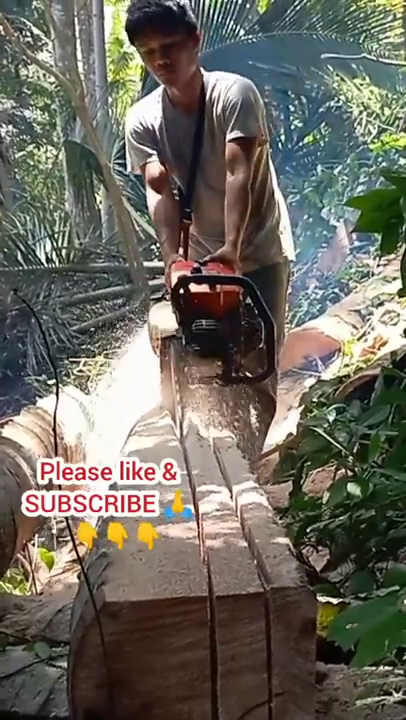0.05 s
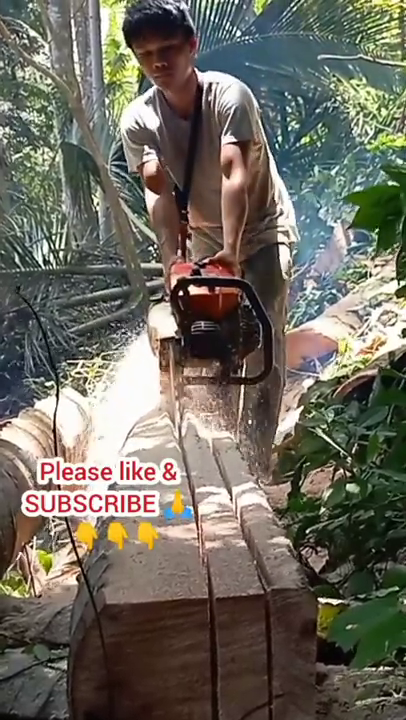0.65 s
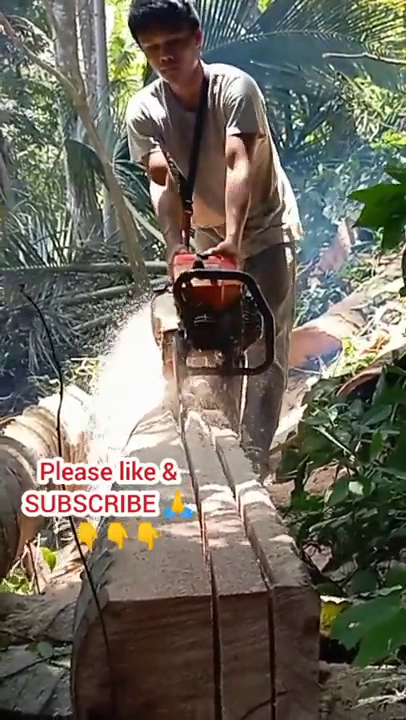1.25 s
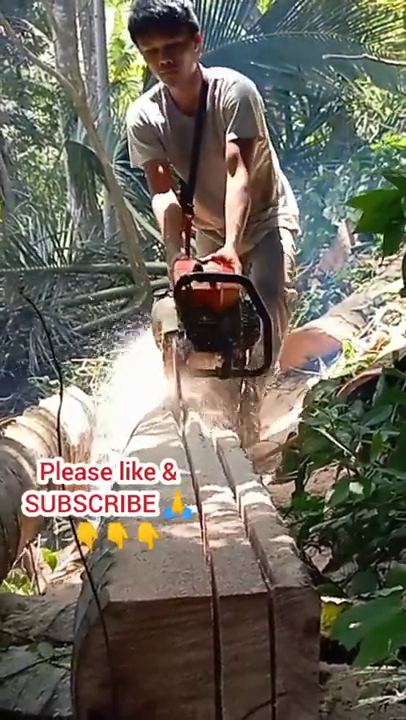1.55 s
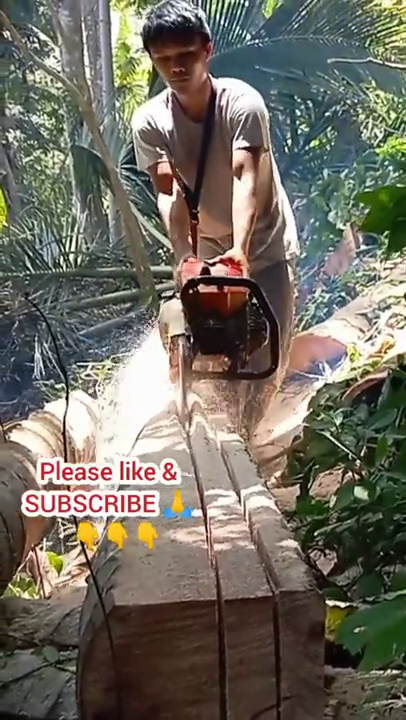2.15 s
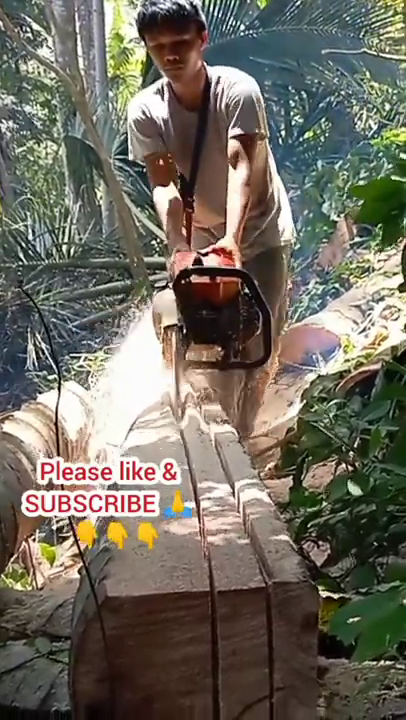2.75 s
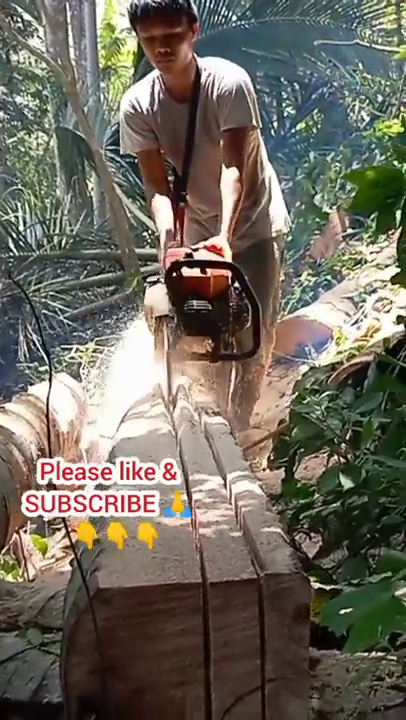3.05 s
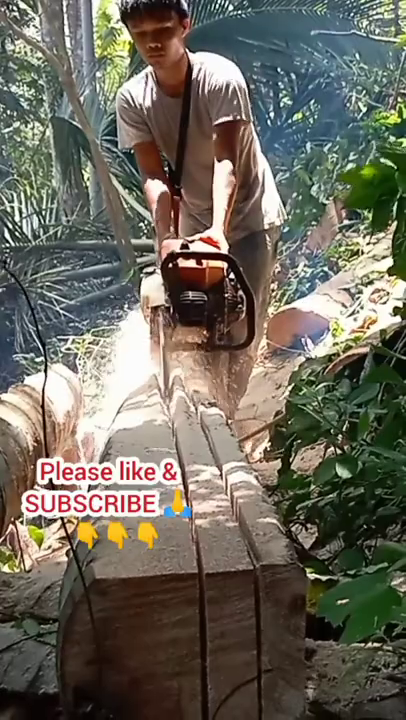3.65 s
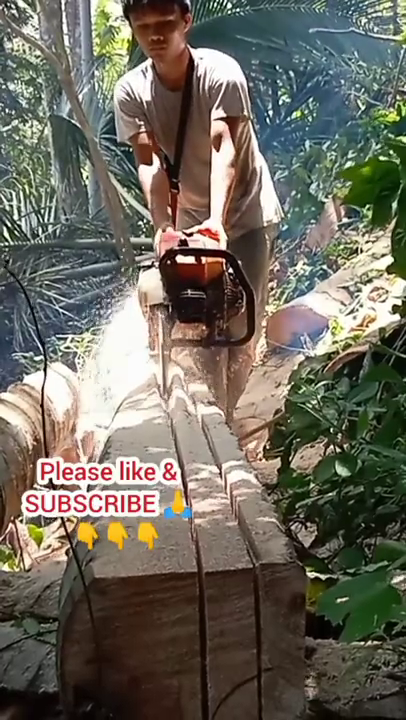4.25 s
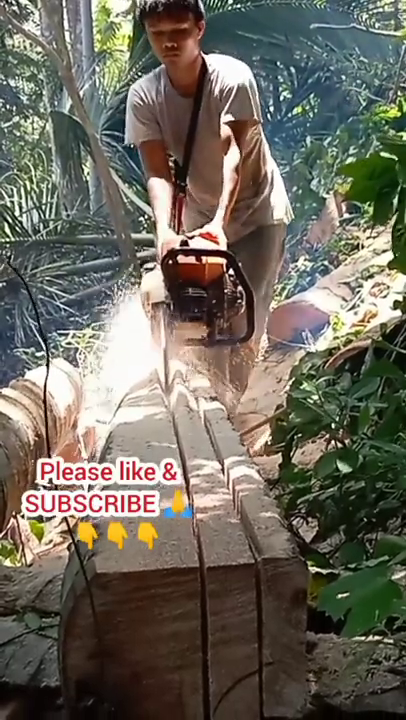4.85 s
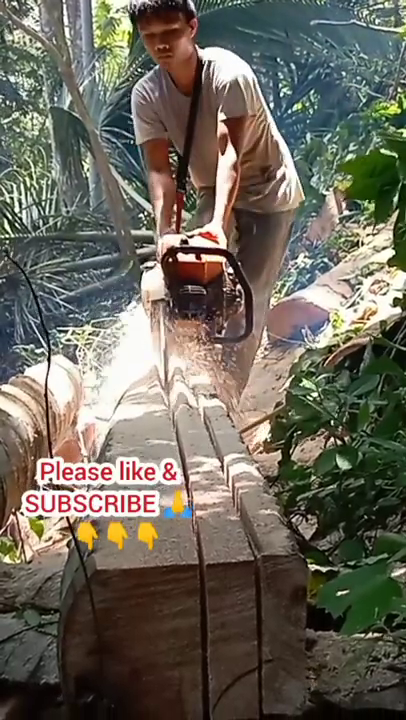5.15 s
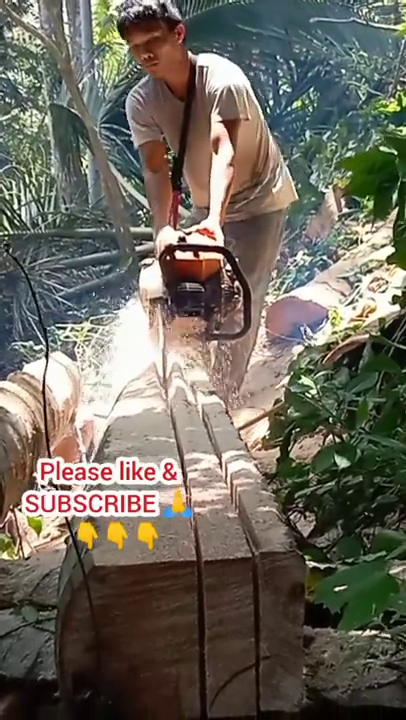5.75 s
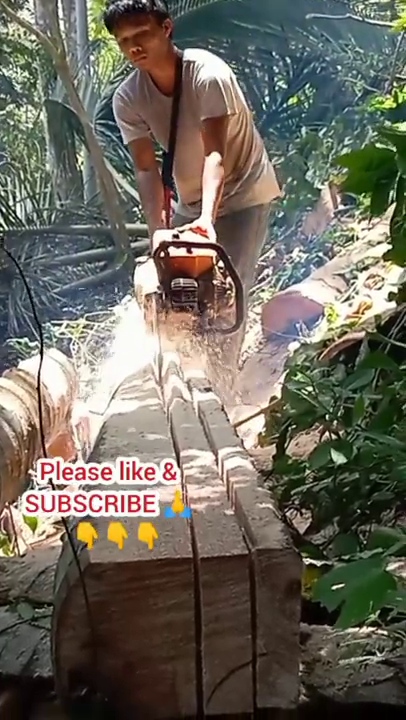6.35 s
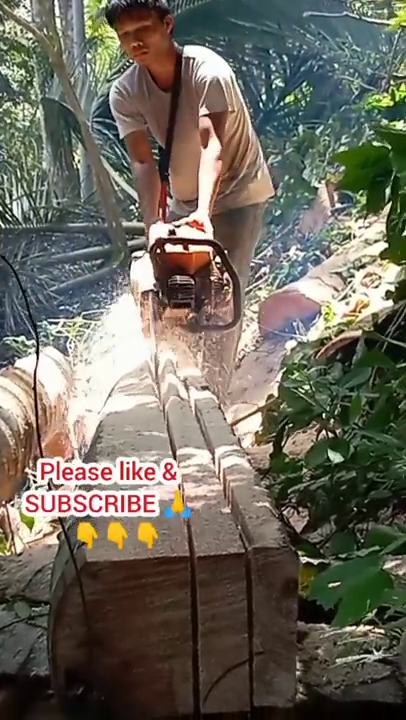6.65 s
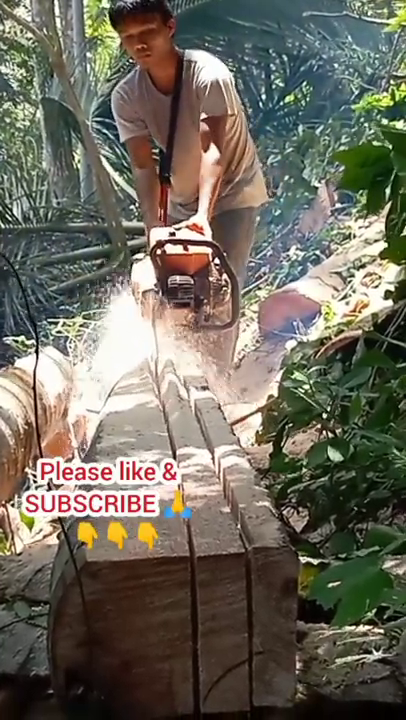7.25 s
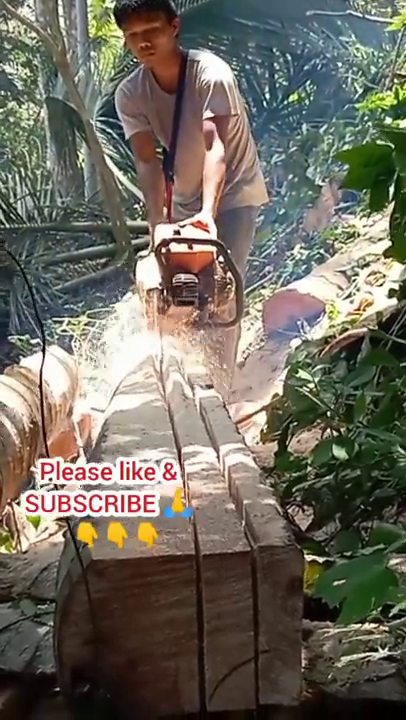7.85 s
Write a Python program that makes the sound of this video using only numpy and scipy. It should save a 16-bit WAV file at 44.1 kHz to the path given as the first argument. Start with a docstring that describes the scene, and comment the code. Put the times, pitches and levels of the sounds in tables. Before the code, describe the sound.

A large two-stroke chainsaw runs at full throttle a few metres away outdoors, cutting lengthwise along a log. Its loud, raspy buzz has a metallic ring and a hissing exhaust. The pitch sags and recovers again and again as the chain bites, with grinding from the cut underneath and a thin, high hiss of spraying chips. It never stops or idles.

```python
"""A large two-stroke chainsaw rips along a log at full throttle, outdoors, a few metres away.
Every turn of the crank fires one exhaust pop, rings the muffler and blows a hissing jet of gas.
The speed sags and recovers as the chain bites; the cutters grind in the cut and throw chips.
A thin, very high hiss rises and falls with the chips."""
import sys
import numpy as np
from scipy import signal
from scipy.fft import rfft, irfft, next_fast_len
from scipy.io import wavfile
from scipy.ndimage import uniform_filter1d, map_coordinates

SR = 44100
rng = np.random.default_rng(int(sys.argv[2]) if len(sys.argv) > 2 else 0)


def wav_out(sig):
    """Save sig, one row per channel (or a flat mono array), as 16-bit PCM at SR to the path in sys.argv[1]."""
    wavfile.write(sys.argv[1], SR, np.round(np.clip(np.atleast_2d(sig).T, -1, 1) * 32767).astype(np.int16))


N = 348831

# The pop's upper tones and the puff weaken as the saw turns away.
# Each row: time in seconds, relative level in dB.
EXHAUST_LEVEL = [(0.0, -27.5), (0.02, -29), (3.61, -29.5), (4.67, -30), (5.18, -31), (7.51, -31.5),
                 (7.91, -30.5)]


def amp(db):
    """Turn decibels into a gain."""
    return 10 ** (np.asarray(db) / 20)


def unit(x):
    """Scale to an average (rms) level of 1."""
    return x / np.sqrt(np.mean(x ** 2) + 1e-20)


def steady(x):
    """Hold the level near 1 all the time, keeping the single firings."""
    power = uniform_filter1d(uniform_filter1d(x ** 2, size=2600), size=2600)
    return x / np.sqrt(np.abs(power) + 1e-12)


def curve(rows):
    """Join (seconds, value) points with straight lines."""
    return np.interp(np.arange(N) / SR, *np.transpose(rows))


def swells(rows):
    """A dB curve with one smooth bump or dip for each row."""
    t = np.arange(N) / SR
    return sum(db * np.exp(-((t - middle) / half) ** 2) for middle, half, db in rows)


def wobble(rate):
    """A smooth random curve of level 1, through `rate` random points a second."""
    points = rng.standard_normal(int(N * rate / SR) + 4)
    coarse = np.linspace(0, N, 8192)
    return unit(np.interp(np.arange(N), coarse, map_coordinates(points, [coarse * rate / SR])))


def causal(gain):
    """The frequency response with these gains that starts at once and then rings out."""
    cepstrum = irfft(np.log(np.maximum(gain, 1e-6)))
    half = len(cepstrum) // 2
    cepstrum[1:half] *= 2
    cepstrum[half + 1:] = 0
    return np.exp(rfft(cepstrum))


def coloured(x, spectrum, peaks=()):
    """Pass x through a body with this spectrum and these narrow peaks; the result has level 1."""
    hz, db = np.transpose(spectrum)
    grid = np.fft.rfftfreq(8192, 1 / SR)
    body_db = np.interp(np.log(grid + 1), np.log(hz + 1), db)
    for centre, width, boost in peaks:
        body_db += boost / (1 + (2 * (grid - centre) / width) ** 2)
    return unit(signal.fftconvolve(x, irfft(causal(amp(body_db))))[:N])


def pulses(turns, jitter_ms, scatter_db):
    """One sharp pulse at each whole turn, a little uneven in time and size."""
    at = np.interp(np.arange(1, int(turns[-1])), turns, np.arange(N))
    late, size = rng.standard_normal((len(at), 2)).T
    at += late * jitter_ms * SR / 1000
    taps = np.floor(at)[:, None] + np.arange(-7, 9)  # a pulse can fall between samples
    offset = taps - at[:, None]
    shape = np.sinc(offset) * np.sinc(offset / 8) * amp(scatter_db * size)[:, None]
    return unit(np.bincount(np.clip(taps, 0, N - 1).astype(int).ravel(), shape.ravel(), N))


def bursts(turns, rise, fall, leak):
    """Noise that surges once a turn over a steady leak; rise and fall are in turns."""
    age = turns % 1
    burst = (1 - np.exp(-age / rise)) * np.exp(-age / fall)
    return unit((burst + leak) * rng.standard_normal(N))


def echoed(x, sway_ms):
    """The log, the ground and the trunks echo the sound; the paths change as the saw sways."""
    # Each row: delay in milliseconds, echo level in dB.
    echoes = [(1.4, -11.5), (2.8, -4.5), (10.6, -10), (20.5, -4.5)]
    now = np.arange(N)
    out = x.copy()
    for delay_ms, db in echoes:
        lag = (delay_ms + sway_ms * wobble(1.6)) * SR / 1000
        out += amp(db) * np.interp(now - lag, now, x, left=0)
    return unit(out) * np.std(x)


def pops(turns):
    """The pressure wave of each firing: clean tones that line up into a pop."""
    # Each row: order (multiple of the firing rate), relative level in dB.
    tones = [(1, -4), (2, -2.5), (3, -1.5), (4, 5), (5, 5), (6, 7.5), (7, 4.5), (8, 2.5), (9, 6),
             (10, -1.5), (11, -1.5), (12, 0.5), (13, -7.5), (14, -16.5), (15, -5), (16, -1), (17, -8.5),
             (18, -12.5), (19, -11.5), (20, -12.5), (21, -16), (22, -10.5)]
    # One tone fades or swells. Each row: middle in seconds, order, half length in seconds, change in dB.
    fades = [(1.22, 5, 0.091, -3), (1.88, 8, 0.15, -18), (1.88, 6, 0.18, -4.5), (2.7, 6, 0.49, -4.5),
             (3.3, 8, 0.26, -24), (3.383, 7, .25, -3.5), (4.3, 6, 0.81, -9), (4.3, 9, 0.92, 3),
             (5.5, 8, 0.98, -3), (5.72, 5, 0.49, -4.5), (5.855, 7, 0.3, 4), (6.63, 6, 0.25, -24),
             (7.012, 7, 0.29, -8), (7.28, 6, 0.13, -14), (7.9, 6, 0.42, -15)]
    order, order_db = np.transpose(tones)
    gains = amp(order_db) / np.linalg.norm(amp(order_db))
    # part of the wave leaves at once, the rest after round trips in the muffler
    direct, trip_turns, smear = 0.84, 0.2, 0.0323
    trip = np.exp(-2j * np.pi * order * trip_turns)
    chamber = (direct + trip) / (1 + direct * trip)
    response = causal(np.r_[gains[0] / 10, gains])[1:]
    phases = np.angle(response * chamber) - smear * order ** 2
    bass, upper = amp(-22.5), amp(curve(EXHAUST_LEVEL) + 5.5)
    wave = np.zeros(N)
    for k, gain, phase in zip(order, gains, phases):
        # a ground bounce drifts in and out of step as the saw sways, most for short waves
        bounce = min(0.03 * k, 0.35) * np.sin(np.pi * wobble(1.2))
        fade = amp(swells([(middle, half, db) for middle, which, half, db in fades if which == k]))
        level = gain * (bass if k < 5 else upper) * fade * (1 + bounce)
        wave += level * np.cos(2 * np.pi * k * turns + phase)
    return np.sqrt(2) * wave * amp(0.56 * wobble(90))


def puffs(turns):
    """Swirling gas bursts out each time the exhaust port opens."""
    # Each row: frequency in Hz, relative level in dB.
    spectrum = [(150, -38), (300, -9), (700, -13.5), (950, -6.5), (1220, -9.5), (1420, -10.5), (1630, -5),
                (2000, -18.5), (2600, -14), (4000, -64)]
    gas = bursts(turns + 0.036, rise=0.082, fall=0.46, leak=0.33)
    return amp(curve(EXHAUST_LEVEL) - 10.5) * coloured(gas, spectrum)


def muffler_ring(blows):
    """Each firing rings the steel muffler, heard directly and off nearby surfaces."""
    # Each row: frequency in Hz, relative level in dB.
    spectrum = [(1500, -30.5), (2100, -30), (2400, -8.5), (2540, -17.5), (2700, -11), (2900, -1), (3050, 5),
                (3160, 5.5), (3300, -1.5), (3410, -17), (3520, -9), (3640, -43), (4200, -19), (5500, -39)]
    # Each row: time in seconds, relative level in dB.
    levels = [(0.0, -26), (0.04, -24.5), (0.31, -26.5), (2.38, -26), (4.01, -25.5), (5.95, -27.5),
              (6.21, -24.5), (6.52, -28.5), (6.85, -24.5), (6.92, -28), (7.49, -25.5), (7.62, -27.5),
              (7.87, -25), (7.91, -28)]
    gain = amp(curve(levels) + 1 + 0.47 * wobble(9.1))
    ring = coloured(blows, spectrum)
    delayed = np.roll(ring, round(0.0032 * SR))
    return gain * steady(ring + amp(-10) * echoed(delayed, sway_ms=0.051))


def cover_ring(blows):
    """The same blows ring the saw's cover at one narrow pitch."""
    # Each row: frequency in Hz, relative level in dB.
    spectrum = [(2100, -40.5), (2400, -33), (2500, 15.5), (2580, 8.5), (2680, -23), (3000, -44)]
    # Each row: time in seconds, relative level in dB.
    levels = [(0.0, -39), (0.42, -38.5), (1.3, -44), (1.76, -37.5), (2.22, -42), (2.31, -34), (2.86, -35),
              (3.1, -45), (3.5, -36), (3.83, -44), (4.63, -45), (5.04, -39), (5.31, -45), (7.91, -44.5)]
    return amp(curve(levels) - 1.5 + 1.8 * wobble(5.7)) * steady(coloured(blows, spectrum))


def jet_hiss(turns):
    """Each firing blows a hissing jet of gas through the port."""
    # Each row: frequency in Hz, relative level in dB.
    spectrum = [(2500, -28.5), (3600, -20), (4400, -12), (4900, -3.5), (5600, -1.5), (5950, -2), (6400, 4),
                (6900, 2), (7040, -4), (7600, -2.5), (8000, -11), (9000, -21.5), (11700, -41)]
    # The steel around the outlet rings. Each row: frequency in Hz, width in Hz, boost in dB.
    steel_peaks = [(4220, 120, 3), (5090, 150, 4), (5510, 200, 5), (6240, 110, 7), (6690, 200, 4),
                   (6850, 130, 5), (7350, 220, 7), (8360, 90, 6)]
    # Each row: time in seconds, relative level in dB.
    levels = [(0.0, -27), (0.02, -26.5), (0.97, -27.5), (2.34, -26.5), (3.15, -28.5), (3.77, -27),
              (6.98, -28), (7.82, -26), (7.91, -28)]
    rush = 0.71 * pulses(turns, jitter_ms=0.013, scatter_db=1.5)
    rush += bursts(turns, rise=0.1, fall=0.13, leak=0.21)
    gain = amp(curve(levels) - 0.34 + 0.85 * wobble(60) + 0.41 * wobble(7))
    return gain * steady(echoed(coloured(rush, spectrum, steel_peaks), sway_ms=0.049))


def chain_load():
    """How hard the chain is fed into the wood, as a grinding level in dB."""
    # Each row: time in seconds, relative level in dB.
    feed = [(0, -47), (2.85, -47), (3.1, -49), (7.91, -50)]
    # The cutters dig deeper. Each row: middle in seconds, half length in seconds, boost in dB.
    bites = [(.01, 0.041, 10), (.6, 0.067, 3), (.87, 0.067, 5), (1.34, 0.13, 5.5), (1.65, 0.094, 6),
             (2.5, 0.15, 2.5), (2.75, 0.089, 8), (3.62, 0.07, 4), (4.88, .05, 4), (6.37, 0.059, 9),
             (7.0, .06, 7), (7.26, .05, 7), (7.74, .05, 7)]
    return curve(feed) + swells(bites)


def grinding(load_db):
    """A deep bite thumps the log, while the rasp of the cutters stays more even."""
    # Each row of both tables: frequency in Hz, relative level in dB.
    log_spectrum = [(20, -67), (40, -14), (70, 1), (160, 2), (300, -0.5), (600, -6), (1500, -34),
                    (4000, -59)]
    cut_spectrum = [(100, -23), (350, -7), (700, -8), (1200, 0), (1450, -20), (2100, -14.5), (4000, -7),
                    (9000, -21)]
    tearing = rng.standard_normal(N) * amp(1.9 * wobble(160) + 1.1 * wobble(22))
    scraping = rng.standard_normal(N) * amp(1.1 * wobble(120))
    thump = amp(load_db + 3) * coloured(tearing, log_spectrum)
    rasp = amp((load_db + np.mean(load_db)) / 2 + 9.5) * coloured(scraping, cut_spectrum)
    return thump + rasp


def chips_and_high_hiss(turns, load_db):
    """A spray of chips and a thin, very high hiss surge each turn and grow as the chain bites."""
    # The chips, plus the hiss: a microphone resonance near 15 kHz.
    # Each row: frequency in Hz, relative level in dB.
    spectrum = [(5000, -6), (8000, -8), (8700, -4), (9400, -3), (9900, -14.5), (10800, -6), (11600, -10),
                (12600, -7), (14100, -13), (14600, 4), (15400, 4.5), (15800, 0.5)]
    # Thin overtones of the chain and its bar. Each row: frequency in Hz, width in Hz, boost in dB.
    bar_peaks = [(8090, 160, 9), (11000, 150, 3), (12080, 280, 8)]
    gain = amp(-41.5 + 0.23 * (load_db - np.mean(load_db)))
    flecks = bursts(turns, rise=0.046, fall=0.28, leak=0.32) * amp(3.3 * wobble(350) + 1.1 * wobble(30))
    return gain * echoed(coloured(flecks, spectrum, bar_peaks), sway_ms=0.028)


def scene():
    """One crank drives both the exhaust and the chain."""
    # The engine sags under load and recovers. Each row: time in seconds, firings a second.
    speed = [(0.0, 103.62), (0.07, 102.43), (0.66, 101.24), (0.82, 103.57), (1.02, 102.02), (1.21, 104.2),
             (1.4, 103.53), (1.5, 101.03), (1.84, 96.63), (2.3, 101.2), (2.83, 102.01), (3.32, 100.74),
             (3.99, 107.77), (4.47, 105.05), (4.71, 107.01), (5.1, 101.5), (5.46, 102.65), (6.02, 99.68),
             (6.41, 102.85), (7.14, 107.16), (7.5, 101.99), (7.91, 106.9)]
    turns = 0.68 + np.cumsum(curve(speed) * (1 + 0.00108 * wobble(40))) / SR
    exhaust = pops(turns + 0.0081) + puffs(turns)  # the pop gets out just before the steel rings
    blows = pulses(turns, jitter_ms=0.0031, scatter_db=0.35)
    blows += 0.23 * bursts(turns, rise=0.12, fall=1.0, leak=0.5)
    exhaust += muffler_ring(blows) + cover_ring(blows) + jet_hiss(turns)
    load_db = chain_load()
    return (exhaust + grinding(load_db) + chips_and_high_hiss(turns, load_db))[None]


def record(dry):
    """Cut off the very highest treble."""
    top_hz = 15780
    size = next_fast_len(N + SR // 2)
    return irfft(rfft(dry, size) * (np.fft.rfftfreq(size, 1 / SR) < top_hz), size)[:, :N]


dry = scene()
out = record(dry)
wav_out(out)
```